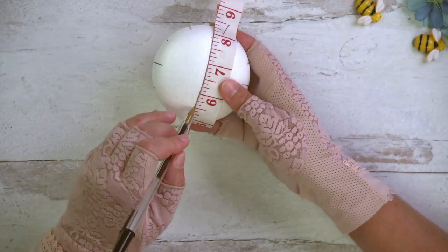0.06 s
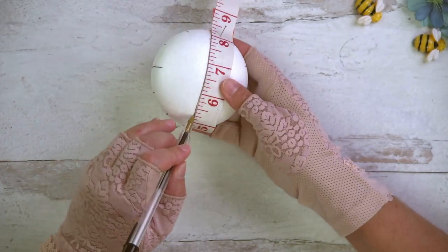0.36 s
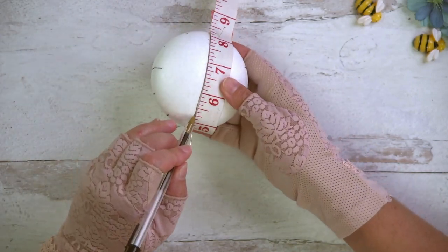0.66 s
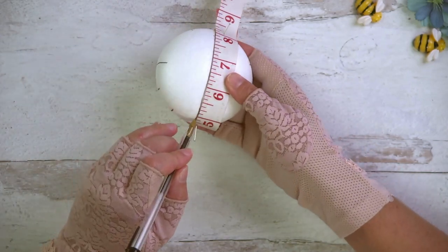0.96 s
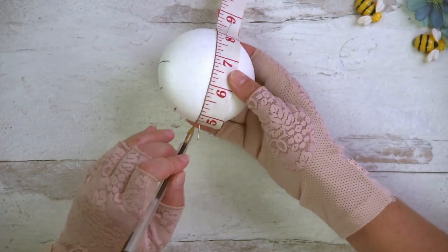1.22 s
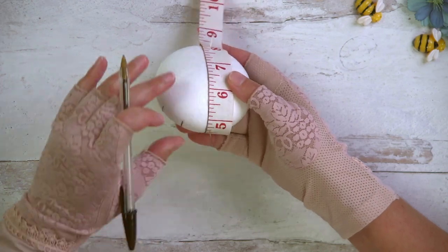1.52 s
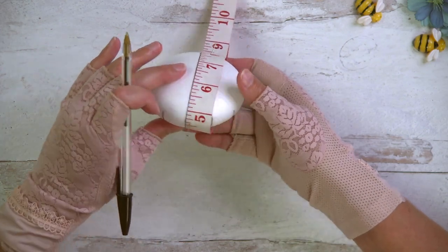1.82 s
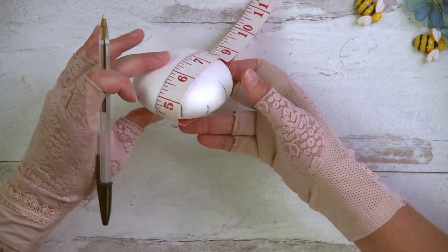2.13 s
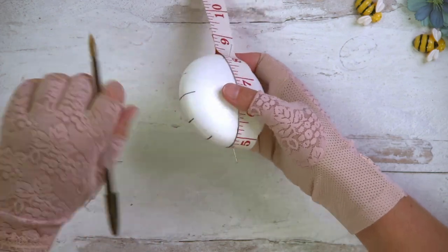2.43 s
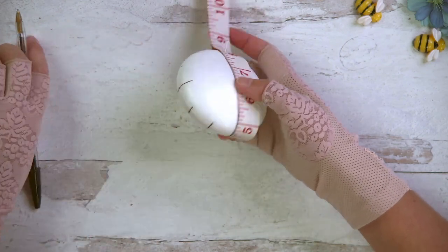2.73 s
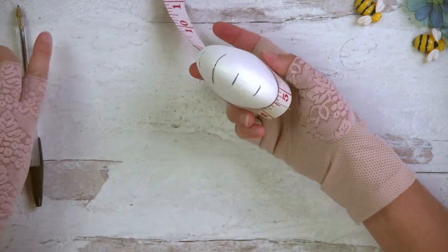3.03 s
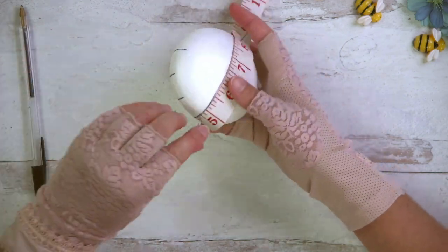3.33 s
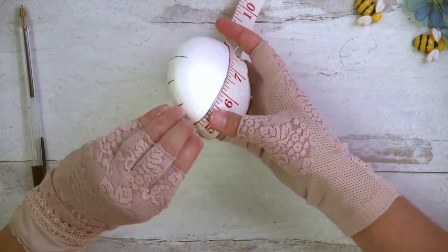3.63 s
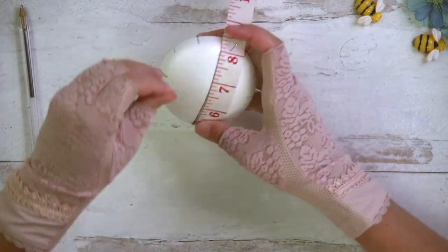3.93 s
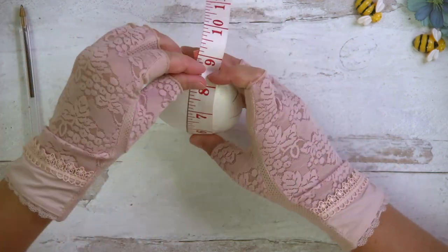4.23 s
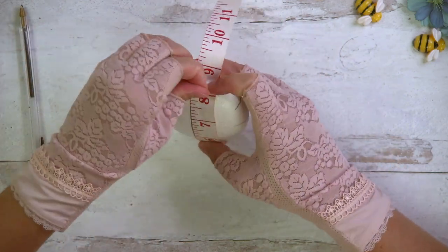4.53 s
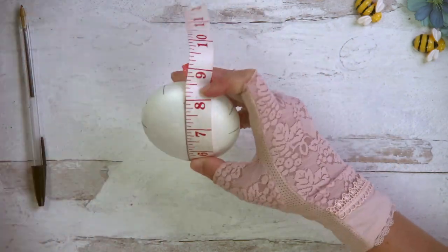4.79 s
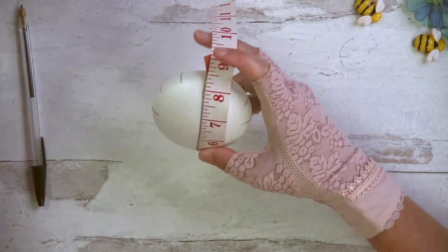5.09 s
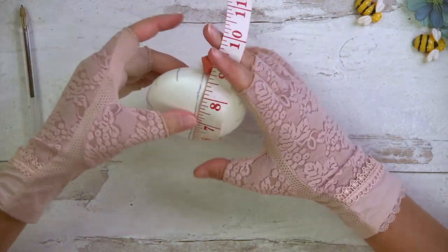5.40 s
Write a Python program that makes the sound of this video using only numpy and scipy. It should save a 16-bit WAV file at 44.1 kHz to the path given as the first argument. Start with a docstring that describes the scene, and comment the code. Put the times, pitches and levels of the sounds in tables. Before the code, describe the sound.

A pen and measuring tape rustle faintly against foam, the pen clatters down sharply, then fingers tap and rub the foam.

```python
"""Soft, dry rubbing and light taps, close up in a small quiet room: hands in lace gloves mark a foam
disc with a ballpoint pen along a measuring tape, brushing the table as they go. The pen is put down with
a sharp clack and bounces, its plastic barrel ringing over the clatter of the board. Fingers and tape then
rub, tap and flick the foam, which rings faintly. A low rumble and a distant appliance hum underneath.
One close microphone feeds the left channel only."""
import sys
import numpy as np
from scipy import signal
from scipy.fft import rfft, irfft
from scipy.io import wavfile

SR = 44100
rng = np.random.default_rng(int(sys.argv[2]) if len(sys.argv) > 2 else 0)


def int16_out(signal):
    """Quantize to a 16-bit WAV file."""
    q = np.round(np.clip(np.atleast_2d(signal).T, -1, 1) * 32767)
    wavfile.write(sys.argv[1], SR, q.astype(np.int16))


N = 249204
TIME = np.arange(N) / SR

# Room rumble and microphone hiss. Each row: frequency in Hz, level in dB.
ROOM_TONE = [(11, -29), (18, 2.5), (33, -0.5), (55, -14.5), (81, -5.5), (152, -21.5), (175, -19.5),
             (346, -28), (576, -32), (627, -29), (908, -36.5), (1850, -45), (2190, -46.5), (6090, -50.5),
             (16000, -52.5)]
# A distant appliance. Each row: frequency in Hz, level in dB.
APPLIANCE_HUM = [(27, -54), (88, -59.5)]
# The room's decay. Each row: frequency in Hz, t60 in seconds.
ROOM_DECAY = [(100, 0.36), (600, 0.33), (3000, 0.23), (8000, 0.18), (16000, 0.16)]
# Pen tip, gloves and tape stroking the foam.
# Each row: start in seconds, length in seconds, bright hiss in dB, dull rub in dB.
STROKES = [(0.0, 0.037, -62.5, -58), (0.09, 0.024, -62.5, -64), (0.166, 0.074, -71.5, -72.5),
           (0.343, 0.022, -66, -70), (0.85, 0.095, -70, -77), (0.957, 0.073, -63.5, -68.5),
           (1.072, 0.014, -62.5, -63), (1.2, 0.014, -70, -70), (1.258, 0.11, -82, -79),
           (1.493, 0.054, -67, -68.5), (1.563, 0.077, -61.5, -74), (1.744, 0.043, -61, -66),
           (1.923, 0.23, -76, -75.5), (2.289, 0.13, -58.5, -75), (2.485, .08, -66, -70),
           (2.613, 0.13, -65, -70), (2.813, .1, -58, -61.5), (3.209, 0.042, -46, -65),
           (3.3, 0.033, -66, -72), (3.378, .035, -64.5, -67), (3.501, 0.082, -59, -67),
           (3.598, 0.13, -55.5, -67.5), (3.766, 0.066, -56.5, -68), (3.889, 0.088, -54.5, -60),
           (4.017, 0.1, -60, -65.5), (4.155, 0.056, -60.5, -65), (4.214, 0.089, -54, -65.5),
           (4.355, 0.068, -59, -60.5), (4.559, 0.084, -54, -64), (4.81, .1, -74.5, -78),
           (4.954, .02, -61, -64.5), (5.182, 0.1, -78, -89), (5.385, 0.054, -54.5, -60),
           (5.443, .09, -58, -68)]
# Quick slips of the tape. Each row: middle in seconds, half length in seconds, hiss in dB, squeak in dB.
SLIPS = [(.568, 0.0025, -74, -66), (1.515, 0.005, -62, -72), (1.77, 0.011, -55.5, -60),
         (1.806, 0.0083, -51, -67), (2.463, .005, -56.5, -76), (3.491, 0.012, -52, -49),
         (3.68, 0.0052, -50.5, -49.5), (3.742, 0.012, -47, -61), (3.772, 0.0041, -49, -65),
         (3.943, .011, -74, -53), (3.972, 0.0099, -67, -49), (4.011, 0.016, -80, -56),
         (4.656, 0.006, -45.5, -69), (5.379, 0.0049, -50, -79), (5.506, 0.0085, -50.5, -67),
         (5.549, 0.03, -54, -63), (5.607, .0075, -61, -62)]
# The dull body of a stroke. Each row: frequency in Hz, level in dB.
RUB_SPECTRUM = [(150, 0), (400, -5), (900, -0.5), (1300, -2.5), (2000, -3), (2600, -2), (3200, -4),
                (4200, -6), (7000, -23.5)]
# The bright top of a stroke. Each row: frequency in Hz, level in dB.
HISS_SPECTRUM = [(1500, -21), (3000, -13.5), (4500, -6.5), (5900, 0), (7200, -2), (9300, -1.5), (11500, -6),
                 (14000, -5), (16000, -8)]
# Foam squeaking under the tape. Each row: centre in Hz, width in Hz, level in dB.
SQUEAK_PEAKS = [(2030, 930, -17), (4730, 240, -28), (5460, 1600, 4.5), (6160, 410, 8.5), (6800, 490, -29)]
# A glove sweeping the table. Each row: middle in seconds, half length in seconds, level in dB.
SWEEPS = [(0.022, .025, -61.5), (.19, 0.051, -75), (1.624, .035, -63.5), (2.38, .04, -60.5),
          (2.686, .02, -62), (2.9, .025, -54), (3.24, .015, -49.5), (3.82, .02, -55.5)]
# The colour of lace on the table top. Each row: centre in Hz, width in Hz, level in dB.
SWEEP_PEAKS = [(3120, 339, 2.5), (4246, 610, -5.5), (6300, 1200, -8), (8100, 1300, -5), (9700, 980, -5.5),
               (12520, 1500, -14)]
# Fingertips and tape tapping the foam.
# Each row: start in seconds, tick level in dB, tick low-pass cutoff in Hz, hollow knock in dB.
TAPS = [(.058, -50, 2500, -57.5), (0.106, -43.5, 3500, -71), (1.2510, -46, 1800, -54),
        (1.509, -42.5, 3020, -59), (1.807, -39, 7000, -73), (2.1243, -47, 2000, -52),
        (3.4809, -36.5, 7200, -63), (3.7448, -18.5, 3500, -43.5), (3.7703, -22, 6000, -38.5),
        (3.902, -37.5, 2500, -71), (3.911, -29, 9000, -66), (4.025, -42, 5970, -73),
        (4.107, -40, 2000, -63), (4.215, -35.5, 2980, -60), (4.313, -35, 3500, -69),
        (4.42, -33.5, 3000, -56), (4.6611, -22.5, 3000, -44.5), (4.8105, -40.5, 6990, -67.5),
        (5.038, -36, 1800, -58), (5.3773, -35.5, 1530, -42.5), (5.4142, -45, 2500, -49),
        (5.486, -38, 1770, -48.5), (5.5000, -28.5, 1830, -50), (5.5034, -48, 1800, -38.5)]
# The tick of a tap. Each row: frequency in Hz, level in dB.
TICK_SPECTRUM = [(200, -47), (800, 0), (1800, 3), (3500, -3), (7000, 5.5), (16000, 3.5)]
# The hollow knock of the disc cupped in the hand. Each row: frequency in Hz, level in dB, t60 in seconds.
DISC_MODES = [(268, -24, 0.049), (498, -2, 0.017), (640, 5.5, 0.0088), (910, 0.5, 0.023),
              (1200, -2.5, 0.014), (1550, -3.5, 0.018), (2110, -4, 0.015)]
# The pen hitting the table.
# Each row: start in seconds, barrel level in dB, barrel pitch in Hz, blow to the board in dB.
PEN_KNOCKS = [(2.731, -27.5, 2940, -61.5), (2.7463, -45.5, 3100, -75), (2.7758, -16.5, 3765, -40),
              (2.7778, -18.5, 2280, -45.5), (2.7855, -27.5, 2320, -63.5), (2.814, -27.5, 3720, -56.5),
              (2.8160, -28, 2150, -60), (2.8303, -33.5, 3300, -66.5), (2.8405, -35, 3900, -63.5),
              (2.853, -37, 2250, -66.5), (2.9568, -36.5, 3695, -38.5), (2.9677, -18, 3960, -50.5),
              (2.9707, 3.5, 2807, -23.5), (3.0054, -9, 3040, -32), (3.0183, -17.5, 2810, -34.5),
              (3.03, -20, 2760, -49), (3.1410, -36, 2740, -39.5), (3.1748, -42, 2760, -43.5)]
# The ring of the pen barrel. Each row: ratio to its pitch, level in dB, t60 in seconds.
BARREL_MODES = [(.41, -17, 0.013), (.97, -9, 0.0089), (1.05, 0.5, 0.0079), (1.24, -11, .009),
                (1.47, -9.5, .009), (1.95, -13.5, .010), (2.4, -20.5, 0.016), (3.15, -18.5, .007)]
# The ring of the table top. Each row: frequency in Hz, level in dB, t60 in seconds.
BOARD_MODES = [(132.8, -12.5, 0.13), (172.5, -16.5, .09), (486, -14.5, .22), (527.2, -13.5, 0.37),
               (636, -11, 0.2), (876, -18, .22), (1117, -16, 0.15), (1290, -13.5, .12), (1436, -18, .13),
               (1663, -22.5, 0.19)]
# The table's dense clatter. Each row: frequency in Hz, level in dB.
CLATTER_SPECTRUM = [(60, -3), (140, -2), (260, -0.5), (400, -5), (550, 0), (1100, 1), (1400, -5),
                    (2000, -7), (2800, -11.5), (4500, -11), (7000, -13.5), (10500, -23), (14000, -24),
                    (16000, -31.5)]
# The ring of the flicked tape and disc. Each row: centre in Hz, width in Hz, level in dB.
FLICK_PEAKS = [(5590, 760, -0.5), (7550, 740, -10), (8150, 110, 0.5), (8800, 510, -3.5), (9650, 280, 0),
               (10200, 145, -2), (11900, 110, -1.5), (13900, 146, -0.5), (15150, 230, -3)]


def from_db(db):
    """Decibels to gain."""
    return 10 ** (np.asarray(db) / 20)


def rms_one(x):
    """Scale to rms 1."""
    return x / np.sqrt(np.mean(x ** 2) + 1e-20)


def at_hz(points, hz):
    """Read a table on a log-frequency axis."""
    frequencies, values = np.transpose(points)
    return np.interp(np.log(np.maximum(hz, 1)), np.log(frequencies), values)


def colour(x, spectrum):
    """EQ a steady sound with a spectrum; rms 1."""
    gain = from_db(at_hz(spectrum, np.fft.rfftfreq(len(x), 1 / SR)))
    return rms_one(irfft(rfft(x) * gain, len(x)))


def resonate(x, peaks):
    """Pass a sound through parallel resonances of alternating polarity; rms 1."""
    bank = [from_db(db) * signal.lfilter(*signal.iirpeak(hz, hz / width, fs=SR), x)
            for hz, width, db in peaks]
    return rms_one(sum(band * (-1) ** k for k, band in enumerate(bank)))


def drift(per_s):
    """A modulator gliding between random values; rms 1."""
    knots = np.random.default_rng(rng.integers(1 << 30)).standard_normal(N)
    return rms_one(np.interp(TIME * per_s, np.arange(N), knots))


def fade(t60, size=22050):
    """A decay that falls 60 dB in t60 seconds."""
    return np.exp(-np.log(1000) * TIME[:size] / max(t60, 1e-4))


def ringing(modes, pitch=1, size=22050):
    """Damped sines after one blow."""
    return sum(from_db(db) * fade(t60, size) * np.sin(2 * np.pi * frequency * pitch * TIME[:size])
               for frequency, db, t60 in modes)


def add(out, start, sound):
    """Mix a sound in at a time in seconds."""
    i = round(start * SR)
    out[i:i + len(sound)] += sound[:N - i]


def background(air_db=-49, waver_db=-1.5, waver_rad=0.36):
    """The bed: low room rumble, microphone hiss and the wavering hum of a distant appliance."""
    air = from_db(air_db) * colour(rng.standard_normal(N), ROOM_TONE)
    hum = 0
    for hz, db in APPLIANCE_HUM:
        level = np.sqrt(2) * from_db(db + waver_db * drift(4.6))
        hum += level * np.sin(2 * np.pi * hz * TIME + waver_rad * drift(8.4))
    return air + hum


def stroke(start, length, attack_s=0.017, release_s=0.031):
    """The speed of one stroke: it builds up, holds and dies away."""
    rise = 1 - np.exp(-np.maximum(TIME - start, 0) / attack_s)
    return rise * np.exp(-np.clip((TIME - start - length) / release_s, 0, 20))


def swell(middle, half, db, steepness=2):
    """A bell-shaped envelope; more steepness makes it start and stop abruptly."""
    return from_db(db) * np.exp(-.5 * np.abs((TIME - middle) / half) ** steepness)


def crinkles(per_s=60, spread_db=4, relative_width=0.29, bands=6):
    """Lone ticks of the buckling tape, scattered over several bands; rms 1."""
    out = 0
    for hz in np.geomspace(2000, 11000, bands):
        sizes = from_db(spread_db * np.minimum(rng.exponential(1, N), 2))
        ticks = sizes * (rng.random(N) < per_s / bands / SR)
        band = signal.iirpeak(hz, 1 / relative_width, fs=SR)
        out += signal.lfilter(*band, ticks + 1e-18) / np.sqrt(hz)
    return rms_one(out)


def friction(per_s, spread_db, smooth_gain):
    """Countless tiny catches of threads and foam beads over a smooth hiss; rms 1."""
    sizes = from_db(spread_db * np.minimum(rng.exponential(1, N), 4)) * rng.choice([-1, 1], N)
    grains = rms_one(sizes * (rng.random(N) < per_s / SR))
    return rms_one(grains + smooth_gain * rng.standard_normal(N))


def moving_contact(x, depth_db=2.5, per_s=23, bands=24):
    """The contact patch keeps moving, so each band swells and fades on its own."""
    log_hz = np.log(np.fft.rfftfreq(N, 1 / SR) + 1)
    centres = np.log(np.geomspace(1000, 15000, bands))
    spectrum, out = rfft(x), 0
    for weights in np.eye(bands):
        band = irfft(spectrum * np.interp(log_hz, centres, weights), N)
        out += band * from_db(depth_db * drift(per_s))
    return out


def foam_rubbing(grip_hiss_db=-82.5, grip_rub_db=-86, crinkle_db=-11, flutter_db=2.0):
    """Pen tip, lace and tape drag over foam: dull rub, bright hiss, crinkles and squeaky slips."""
    hiss_level, rub_level = from_db(grip_hiss_db), from_db(grip_rub_db)   # the holding hand never rests
    for start, length, hiss_db, rub_db in STROKES:
        speed = stroke(start, length)
        hiss_level += from_db(hiss_db) * speed
        rub_level += from_db(rub_db) * speed
    crackle = hiss_level * from_db(crinkle_db) * crinkles()
    squeak_level = 0
    for middle, half, hiss_db, squeak_db in SLIPS:
        hiss_level += swell(middle, half, hiss_db, steepness=4)
        squeak_level += swell(middle, half, squeak_db, steepness=4)
    threads = friction(per_s=700, spread_db=1.5, smooth_gain=0.99)
    beads = friction(per_s=3800, spread_db=2, smooth_gain=0.74)
    catches = friction(per_s=1900, spread_db=2, smooth_gain=0.69)
    drag = rub_level * colour(threads, RUB_SPECTRUM) + hiss_level * colour(beads, HISS_SPECTRUM)
    squeak = squeak_level * resonate(catches, SQUEAK_PEAKS)
    pressure = from_db(flutter_db * drift(70))
    return pressure * (moving_contact(drag) + squeak) + crackle


def table_sweeps():
    """Lace brushing the table excites a few broad resonances."""
    threads = friction(per_s=5000, spread_db=1, smooth_gain=2.2)
    return sum(swell(*sweep) for sweep in SWEEPS) * resonate(threads, SWEEP_PEAKS)


def tight_click(spectrum, size=2048):
    """The tightest click with this spectrum: a minimum-phase pulse."""
    gain = from_db(at_hz(spectrum, np.fft.rfftfreq(size, 1 / SR)))
    cepstrum = irfft(np.log(gain))
    cepstrum[1:size // 2] *= 2
    cepstrum[size // 2 + 1:] = 0
    return irfft(np.exp(rfft(cepstrum)))


def foam_taps(crunch_gain=0.13, crunch_t60=0.022, grip_spread=0.036, size=4096):
    """Each touch is a tick with a crunch of beads, over a hollow knock whose pitch varies with the grip."""
    out, click = np.zeros(N), tight_click(TICK_SPECTRUM)
    for start, tick_db, cutoff_hz, knock_db in TAPS:
        force = crunch_gain * rng.standard_normal(size) * fade(crunch_t60, size)
        force[0] = 1   # the touch itself, ahead of the crunch
        soften = signal.butter(1, cutoff_hz, fs=SR)
        tick = signal.lfilter(*soften, signal.fftconvolve(force, click)[:size])
        add(out, start, from_db(tick_db) * tick / np.abs(tick).max())
        grip_pitch = np.exp(grip_spread * rng.standard_normal())
        add(out, start, from_db(knock_db) * ringing(DISC_MODES, grip_pitch))
    return out


def pen_barrel(crack_db=-10, crack_t60=0.01, hardening=.25, contact_s=0.00024, size=4096):
    """The hard plastic barrel rings for a few ms at each contact; harder blows crack more brightly."""
    out = np.zeros(N)
    low_cut = signal.butter(2, 1200, "high", fs=SR)   # a thin barrel radiates little bass
    contact = 1 - np.exp(-TIME[:size] / contact_s)   # the force builds over a fraction of a ms
    for start, db, pitch_hz, _ in PEN_KNOCKS:
        crack_level = from_db(crack_db + hardening * db) / 2
        crack = crack_level * rng.standard_normal(size) * fade(crack_t60, size)
        ring = ringing(BARREL_MODES, pitch_hz, size)
        add(out, start, from_db(db) * signal.lfilter(*low_cut, contact * (ring + crack)))
    return out


def table_top(clatter_db=-4, clatter_t60=0.22, size=22050):
    """The board answers each blow of the pen with low modes and a dense clatter."""
    out = np.zeros(N)
    for start, _, _, blow_db in PEN_KNOCKS:
        # each spot on the board drives the modes with signs of its own
        modes = sum(rng.choice([-1, 1]) * ringing([mode]) for mode in BOARD_MODES)
        noise = colour(rng.standard_normal(size), CLATTER_SPECTRUM)
        clatter = from_db(clatter_db) * noise * fade(clatter_t60)
        add(out, start, from_db(blow_db) * (modes + clatter))
    return out


def tape_flick(start=5.0378, snap_db=-35, snap_t60=0.056, shiver_db=-46, shiver_t60=0.28, size=22050):
    """The tape's edge snaps off a fingernail, leaving a shiver on the strongest modes of tape and disc."""
    out = np.zeros(N)
    snap = resonate(rng.standard_normal(size), FLICK_PEAKS)
    shiver = resonate(rng.standard_normal(size), FLICK_PEAKS)
    shiver = resonate(shiver, FLICK_PEAKS)   # a second pass narrows the peaks
    add(out, start, from_db(snap_db) * snap * fade(snap_t60))
    add(out, start, from_db(shiver_db) * shiver * fade(shiver_t60))
    return out


def room(x, wet_db, predelay_s=0.0052, size=22050):
    """Direct sound plus a diffuse tail whose treble dies first."""
    white, tail = rng.standard_normal((2, size)), 0
    for k, hz in enumerate(np.geomspace(90, 14000, 8)):
        octave = signal.butter(2, [hz / np.sqrt(2), hz * np.sqrt(2)], "band", fs=SR, output="sos")
        tail += signal.sosfilt(octave, white[k % 2]) * fade(at_hz(ROOM_DECAY, hz))
    tail *= np.clip(TIME[:size] / predelay_s - 1, 0, 1)   # the first walls answer after a few ms
    return x + from_db(wet_db) * signal.fftconvolve(x, tail / np.linalg.norm(tail))[:N]


def scene():
    """Everything reaches one microphone on the left; the right channel holds only a faint hiss."""
    pen = room(pen_barrel(), wet_db=-13.5) + room(table_top(), wet_db=-13)
    touches = room(foam_taps() + tape_flick(), wet_db=-10)
    rubbing = room(foam_rubbing() + table_sweeps(), wet_db=-14.5)
    left = 2 * (pen + touches + rubbing + background())
    right = from_db(-83.5) * rng.standard_normal(N)
    return np.array([left, right])


def record(dry, ceiling=0.9, cutoff_hz=16000):
    """The loudest clack overloads the input; a steep low-pass takes off the very top."""
    clipped = np.clip(dry, -ceiling, ceiling)
    high_cut = signal.ellip(14, .1, 90, cutoff_hz, fs=SR, output="sos")
    return signal.sosfilt(high_cut, clipped)


dry = scene()
out = record(dry)
int16_out(out)
```